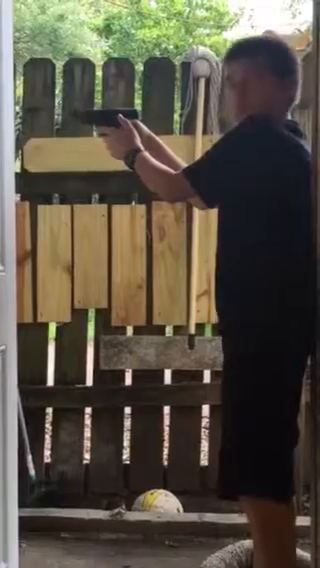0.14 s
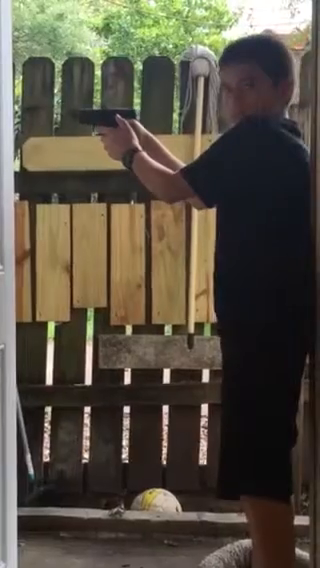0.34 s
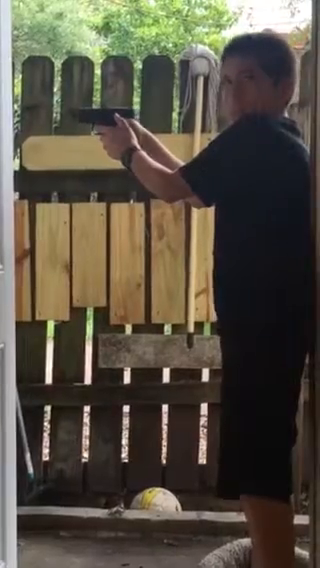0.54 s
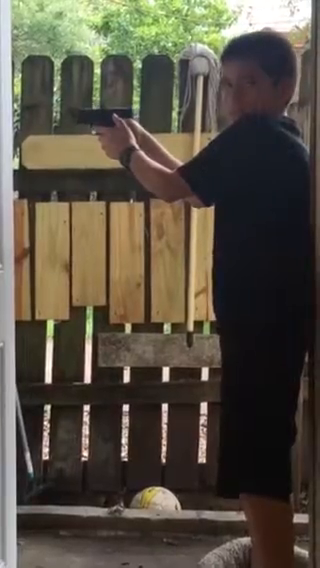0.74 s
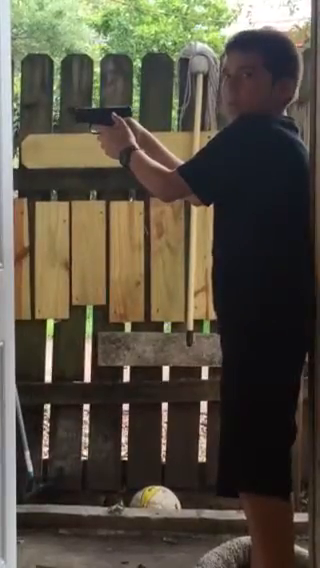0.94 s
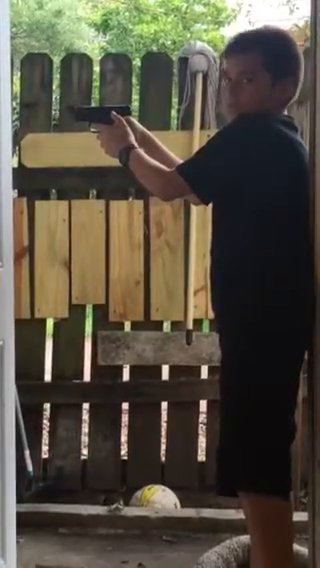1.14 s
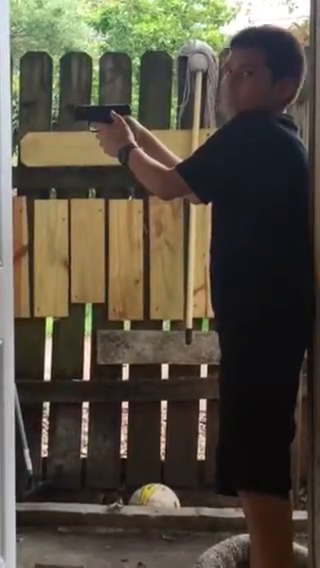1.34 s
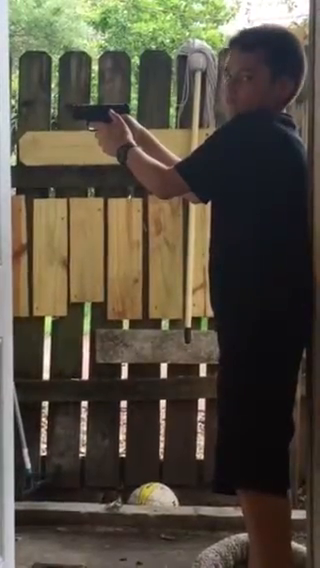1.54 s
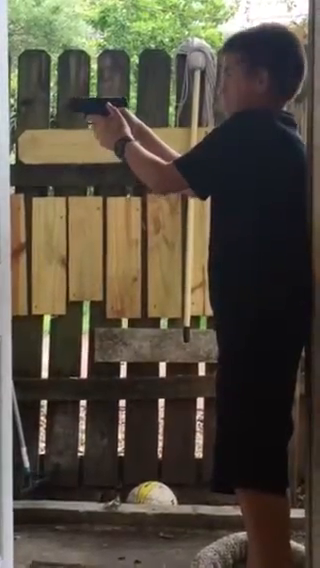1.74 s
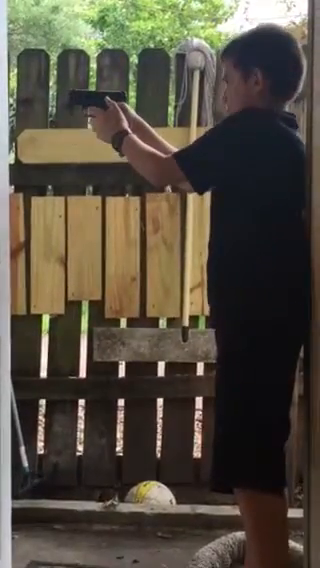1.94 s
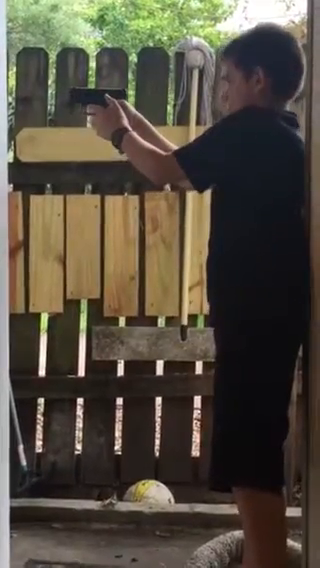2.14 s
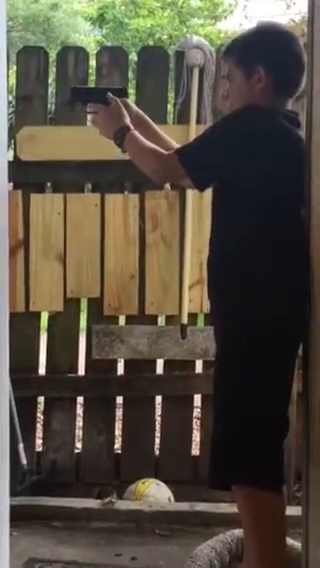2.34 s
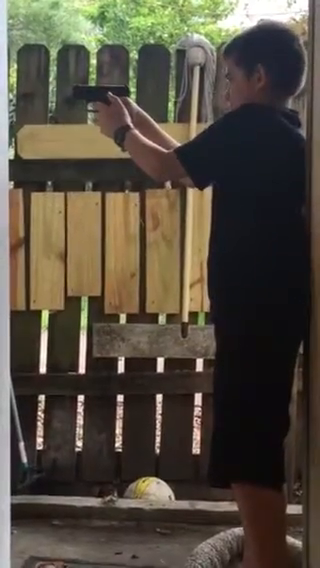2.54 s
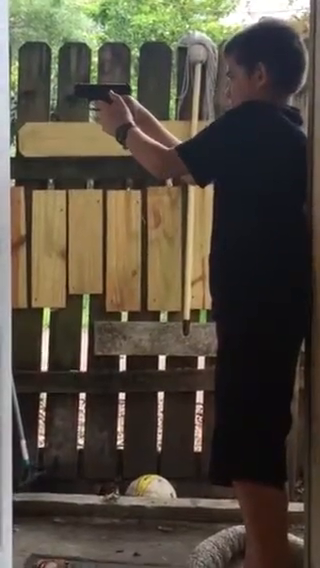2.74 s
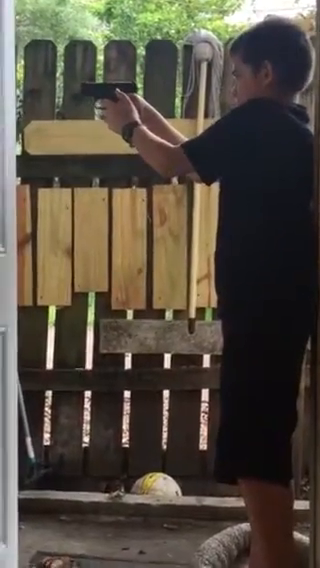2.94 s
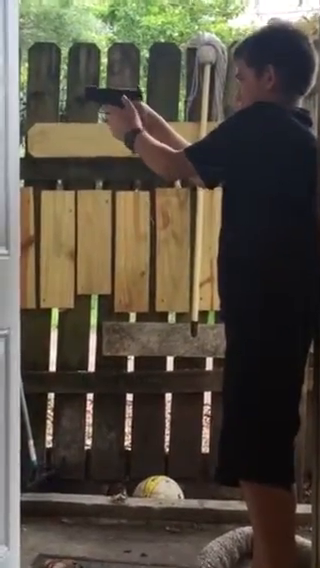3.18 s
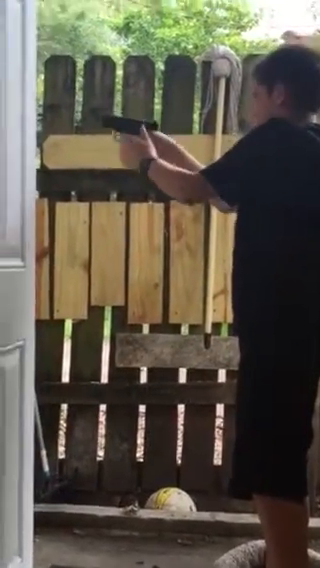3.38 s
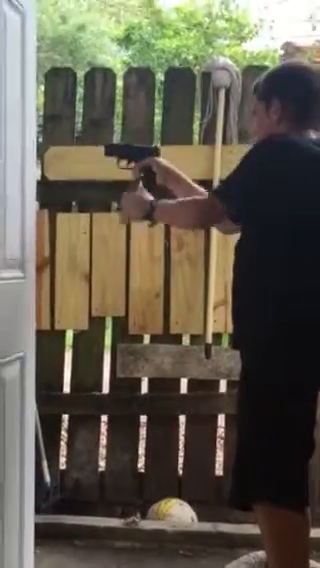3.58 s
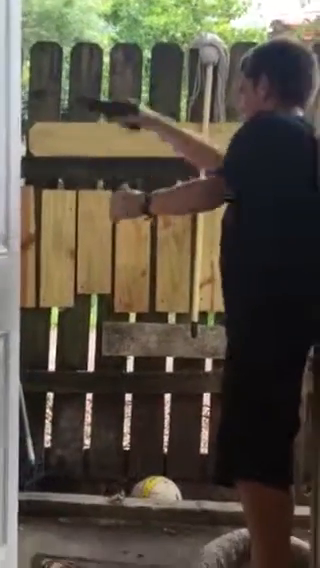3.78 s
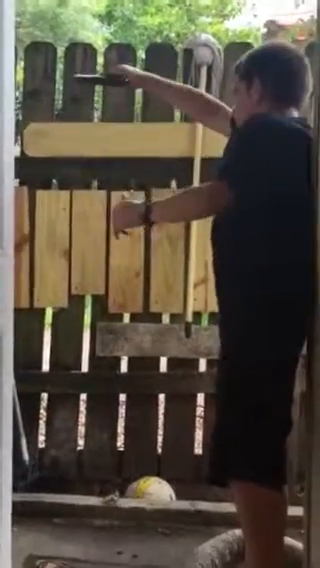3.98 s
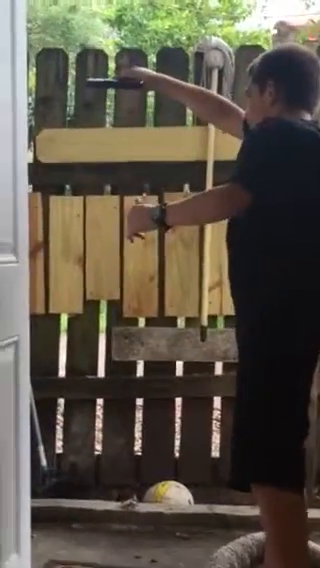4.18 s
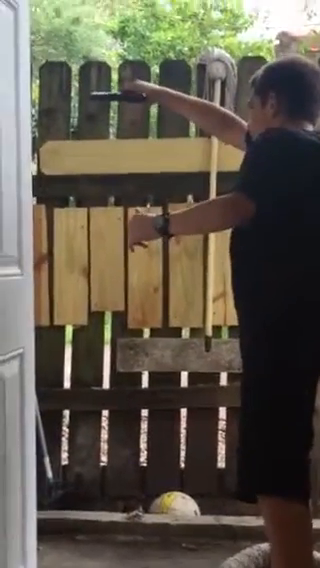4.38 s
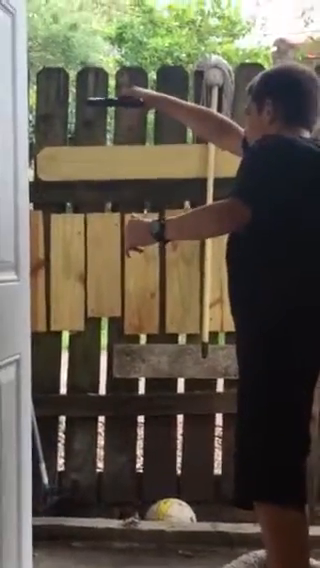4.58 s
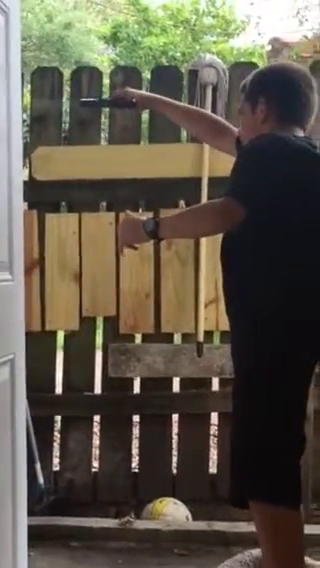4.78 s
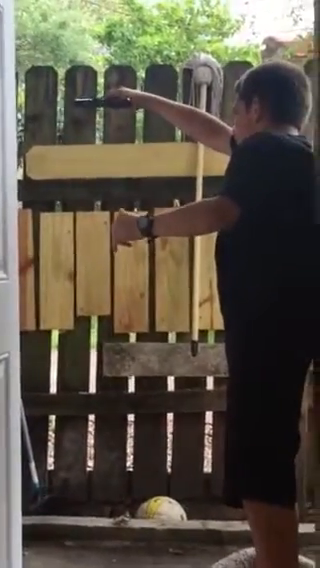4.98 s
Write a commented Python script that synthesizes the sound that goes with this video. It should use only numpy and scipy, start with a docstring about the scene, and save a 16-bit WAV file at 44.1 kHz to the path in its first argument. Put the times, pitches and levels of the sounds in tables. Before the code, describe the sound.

A low, throbbing air-conditioner hum with soft fan rush and a faint whine runs for two seconds. After small clicks, a gas pistol fires three sharp pops in quick succession, pauses with faint grip handling and clicks, then fires two more. Short bright echoes return from the porch roof and wooden fence. A phone a few steps away overloads on the pops and ducks the hum afterward.

```python
"""An air conditioner hums and rushes, then a CO2 pistol fires five shots on a roofed porch by a wooden fence.
The hum is a harmonic series on the compressor's shaft speed; the rush is noise shaped to a fan's spectrum.
Each shot is trigger clicks, a ringing valve, and a gas burst that excites the barrel and the porch's modes.
A phone a few steps away overloads on the peaks, and its gain control ducks the hum after loud sound."""
import sys
import numpy as np
from scipy import signal
from scipy.fft import rfft, irfft, next_fast_len
from scipy.io import wavfile
from scipy.ndimage import uniform_filter1d, minimum_filter1d, map_coordinates

SR = 44100
rng = np.random.default_rng(int(sys.argv[2]) if len(sys.argv) > 2 else 0)


def wav_record(signal):
    """Record a signal, one row per channel, as 16-bit PCM in the file named by sys.argv[1]."""
    frames = np.transpose(np.atleast_2d(signal))
    bounded = np.clip(frames, -1, 1)
    # unit amplitude maps onto the largest positive 16-bit level
    quanta = np.round(bounded * 32767).astype(np.int16)
    wavfile.write(sys.argv[1], SR, quanta)


N = 221293  # length in samples

# Harmonics of the compressor. Each row: multiple of its shaft speed, relative level in dB.
COMPRESSOR_HARMONICS = [(1, 2.5), (2, -6.5), (3, -5.5), (4, -7), (5, -21), (6, -22.5), (7, -20.5),
                        (8, -26.5)]
# Mains buzz and fan tones. Each row: frequency in Hz, mean level in dB rms.
MOTOR_TONES = [(120, -54), (360, -59), (577, -67), (924, -66), (1213, -72), (1444, -72)]
# Spectrum of fan rush and outdoor air. Each row: frequency in Hz, relative density in dB per Hz.
AIR_SPECTRUM = [(20, -22), (50, -20), (75, -5.5), (125, 0), (240, -13.5), (370, -16.5), (500, -21),
                (780, -23.5), (1000, -24.5), (1500, -29), (1800, -35.5), (2650, -44), (3400, -38),
                (4500, -50), (5700, -46), (8000, -54), (15300, -56.5)]
# Hand and sleeve rubbing on the grip. Each row: centre in seconds, length in seconds, level in dB.
GRIP_RUBS = [(2.08, .025, -70), (3.63, 0.055, -72), (4.2, 0.19, -69.5), (4.389, .035, -59.5)]
# Clicks of the pistol as the grip shifts. Each row: start in seconds, level in dB.
GRIP_CLICKS = [(2.032, -53), (2.076, -57), (3.598, -61), (4.372, -42), (4.391, -42.5)]
# Spectrum of clicks and rubbing. Each row: frequency in Hz, relative density in dB per Hz.
CLICK_SPECTRUM = [(300, -29), (1300, -14), (2400, 6.5), (4500, -4), (8500, -5.5), (15000, -13)]
# Decay of the late echoes. Each row: frequency in Hz, time to fall 60 dB in seconds.
ECHO_DECAY = [(150, 0.77), (450, 0.21), (1000, 0.57), (2500, 0.59), (6000, 0.63), (9000, 0.56),
              (15000, 0.34)]
# Standing waves between floor, roof and fence.
# Each row: frequency in Hz, relative level in dB, time to fall 60 dB in seconds.
PORCH_STANDING_WAVES = [(101.4, -12.5, 0.22), (127, -19, 0.14), (186.6, -8, 0.19), (231.6, -12, 0.32),
                        (262.7, -8.5, 0.27), (455, -11.5, 0.16), (677, -14.5, .2), (761, -9.5, 0.35),
                        (809.5, -9, 0.24), (887.6, -9.5, 0.33), (1092, -17.5, .35), (1207, -9.5, 0.3),
                        (1372, -17, .38), (1790, -15.5, 0.34), (2054, -14.5, .38)]
# Spectrum of the gas jet. Each row: frequency in Hz, relative density in dB per Hz.
GAS_SPECTRUM = [(60, -15), (200, -10.5), (330, -15.5), (540, -11.5), (760, -3), (1000, -7.5), (1300, -5.5),
                (1700, -6), (2500, -7.5), (4500, -10), (6200, -9.5), (8700, -10.5), (10400, -15.5),
                (11500, -12.5), (15300, -15.5)]
# Resonances of barrel and slide. Each row: frequency in Hz, width in Hz, gain in dB.
BARREL_RESONANCES = [(1237, 170, -1.5), (2274, 430, 0), (2630, 160, -8), (3700, 200, -8.5),
                     (5897, 280, -5.5), (8420, 430, -7.5)]
# The five shots. Each row: start in seconds, then relative levels in dB of the gas, the valve ping
# and the low push, then the level in dB of the trigger.
SHOT_TABLE = [(2.261, 0, -4, 0.5, -32), (2.5974, 0, 2, -1.5, -32), (2.9571, -0.5, 5, -0.5, -34),
              (4.6037, 1, -1, 0.5, -37.5), (4.9262, 1.5, 5.5, 1, -31)]
# Dips in the microphone's response. Each row: frequency in Hz, width in Hz, gain in dB.
MICROPHONE_DIPS = [(10450, 230, -7), (6590, 200, -3)]

COMPRESSOR_DB, FAN_DB = -42, -46.5  # mean levels
LOAD_DB, LOAD_PER_S = 0.75, 3  # depth and rate of the compressor's slow wandering
WHINE_DB, WHINE_FADE_DB_PER_S = 1.3, 1.5  # starting gain of the whine, and its slow weakening
TRIGGER_LEAD_S = .0225  # the trigger breaks this long before every shot
LINKAGE_S, LINKAGE_DB = .0038, -2  # its linkage clicks just after it
TOP_HZ = 15500  # band limit


def amp(db):
    """A level in decibels is twenty times the log of an amplitude ratio; this inverts it."""
    return 10 ** (np.asarray(db) / 20)


def unit(x):
    """Normalisation: equal mean power is an rms of 1."""
    return x / np.sqrt(np.mean(x ** 2) + 1e-20)


def along(points, hz):
    """Interpolation on a log-frequency axis through (Hz, value) points."""
    f, v = np.transpose(points)
    return np.interp(np.log(hz + 1), np.log(f), v)


def wobble(rate):
    """Slow random modulation: a smooth curve through random knots, rate of them a second."""
    knots = rng.standard_normal(int(N * rate / SR) + 4)
    return map_coordinates(knots, [np.arange(N) * rate / SR])


def filtered(x, response):
    """Linear filtering: the spectrum is multiplied by a response of frequency."""
    m = next_fast_len(len(x) + SR // 2)
    return irfft(rfft(x, m) * response(np.fft.rfftfreq(m, 1 / SR)), m)[:len(x)]


def coloured(x, spectrum, size=4096):
    """Minimum-phase filtering: a causal response of energy 1 is built from the spectrum's cepstrum."""
    magnitude = amp(along(spectrum, np.fft.rfftfreq(size, 1 / SR)))
    cepstrum = irfft(np.log(magnitude + 1e-6))
    response = irfft(np.exp(rfft(2 * cepstrum[:size // 2], size)))
    return signal.fftconvolve(x, response / np.linalg.norm(response))[:len(x)]


def resonant(x, modes):
    """Resonance: damped second-order oscillators in parallel, as (Hz, width, dB)."""
    def response(f):
        return sum(amp(db) * 1j * f * w / (c * c - f * f + 1j * f * w) for c, w, db in modes)
    return filtered(x, response)


def add(track, s, sound):
    """Superposition: a sound is summed into the track from time s."""
    part = track[round(s * SR):][:len(sound)]
    part += sound[:len(part)]


def burst(t60):
    """Exponential decay: a second of noise starts at once and falls 60 dB in t60 seconds."""
    return rng.standard_normal(SR) * amp(-60 * np.arange(SR) / SR / t60)


def compressor(shaft_hz=58.2, waver_db=2):
    """Periodic forcing: cosine harmonics in phase add up to one thud a turn of the shaft."""
    t = np.arange(N) / SR
    shaft = 2 * np.pi * shaft_hz * t + 0.065 * wobble(15)
    harmonics = [amp(db + waver_db * wobble(8.3)) * np.cos(k * shaft) for k, db in COMPRESSOR_HARMONICS]
    strokes = -unit(sum(harmonics))
    return amp(COMPRESSOR_DB + LOAD_DB * wobble(LOAD_PER_S)) * strokes


def motor(waver_db=2, drift=.7):
    """Tonal radiation: sine lines with randomly wandering level and phase (drift in radians)."""
    t = np.arange(N) / SR
    tones = np.zeros(N)
    for hz, db in MOTOR_TONES:
        level = np.sqrt(2) * amp(db + waver_db * wobble(7.7))  # rms to peak
        tones += level * np.sin(2 * np.pi * hz * t + drift * wobble(5.2))
    return tones


def whine(whine_hz=2228):
    """Narrow-band sound: an unsteady sine and resonant noise beside it weaken together."""
    t = np.arange(N) / SR
    tone = amp(-62.5 + 2.6 * wobble(22)) * np.sin(2 * np.pi * whine_hz * t + 0.53 * wobble(12))
    narrow = resonant(rng.standard_normal(N), [(2214, 170, 0)])
    narrow = resonant(narrow, [(2080, 470, 0)])
    whistle = amp(-67.0 + 1.6 * wobble(4.2)) * unit(narrow)
    return amp(WHINE_DB - WHINE_FADE_DB_PER_S * t) * (tone + whistle)


def fan():
    """Broadband flow noise: random pressure shaped to the air's spectrum, gently varying in level."""
    rush = coloured(rng.standard_normal(N), AIR_SPECTRUM)
    return amp(FAN_DB + 0.82 * wobble(7.6)) * rush


def air_conditioner():
    """Superposition of harmonic, tonal and broadband sources in one machine."""
    return compressor() + motor() + whine() + fan()


def handling():
    """Friction noise: rubbing as the grip shifts, in soft swells with a rough random envelope."""
    t = np.arange(N) / SR
    swell = sum(amp(db) * np.exp(-((t - s) / length) ** 2) for s, length, db in GRIP_RUBS)
    return swell * amp(3.4 * wobble(60)) * coloured(rng.standard_normal(N), CLICK_SPECTRUM)


def echoes(early_db=2, late_db=1, early_t60=.18, gap=0.0022, reach=.56):
    """Reverberation: dense echoes off roof and fence, and a tail whose decay depends on frequency."""
    t = np.arange(SR) / SR
    hz, frames, z = signal.stft(rng.standard_normal(SR), SR, nperseg=256)
    decay = amp(-60 * frames / along(ECHO_DECAY, hz)[:, None])
    late = signal.istft(z * decay, SR, nperseg=256)[1][:SR]
    late *= np.exp(-(t / reach) ** 6)  # the open yard has no far walls to prolong the tail
    early = burst(early_t60) * np.abs(rng.standard_normal(SR)) ** .5  # a few echoes stand out
    onset = 1 - np.exp(-t / gap)
    return (amp(early_db) * unit(early) + amp(late_db) * unit(late)) * onset / np.sqrt(SR)


def porch(walls, alike=0.87):
    """Partial correlation: the same walls answer every time, but never quite alike."""
    return np.sqrt(alike) * walls + np.sqrt(1 - alike) * echoes()


def standing_waves():
    """Modal decay: each porch mode rings as a damped sine, neighbours with opposite signs."""
    t = np.arange(SR) / SR
    rings = np.zeros(SR)
    for k, (hz, db, t60) in enumerate(PORCH_STANDING_WAVES):
        rings += (-1) ** k * amp(db - 60 * t / t60) * np.sin(2 * np.pi * hz * t)
    return rings * (1 - np.exp(-t / 0.0015))


def push(hz=135, length=0.013, delay=.0135):
    """Volume displacement: the expanding gas cloud swings the air between floor and roof."""
    t = np.arange(SR) / SR
    swing = -np.sin(2 * np.pi * hz * (t - delay)) * np.exp(-((t - delay) / length) ** 2)
    return swing * (1 - np.exp(-t / 0.0044))


def trigger(walls, creak_hz=3080, creak_db=-62):
    """Impact and stick-slip: two clicks before each shot, grip clicks, and a spring creak before the first."""
    out = np.zeros(N)
    breaks = [(s - TRIGGER_LEAD_S, db) for s, *_, db in SHOT_TABLE]
    linkage = [(s + LINKAGE_S, db + LINKAGE_DB) for s, db in breaks]
    for s, db in breaks + linkage + GRIP_CLICKS:
        click = burst(t60=.01) + amp(13) * porch(walls)
        add(out, s, amp(db) * coloured(click, CLICK_SPECTRUM))
    creak = unit(resonant(rng.standard_normal(N), [(creak_hz, 60, 0)]))
    pull = np.exp(-((np.arange(N) / SR - 2.21) / .03) ** 4)
    return out + amp(creak_db) * creak * pull


def valve_ping(hz=8400, t60=0.0076, slide_s=0.0086, slide_db=-5):
    """Free vibration: steel rings when the hammer strikes the valve and again as the slide hits its stop."""
    t = np.arange(SR) / SR
    ring = np.sin(2 * np.pi * hz * t) * amp(-60 * t / t60)
    both = ring.copy()
    add(both, slide_s, amp(slide_db) * ring)
    return both


def pistol(walls):
    """Jet noise and resonance: gas hisses, rings the barrel, and its push sets off standing waves."""
    out, t = np.zeros(N), np.arange(SR) / SR
    low = amp(-8.0) * standing_waves() + amp(-13.5) * push()
    opening = 1 - np.exp(-t / 0.0005)  # the valve takes a moment to open
    for s, gas_db, ping_db, push_db, _ in SHOT_TABLE:
        answer = porch(walls)
        jet = coloured(burst(t60=0.03) + amp(24) * answer, GAS_SPECTRUM)
        barrel = resonant(amp(15) * burst(t60=0.043) + amp(26.5) * answer, BARREL_RESONANCES)
        gas = amp(gas_db) * (jet + barrel)
        ping = amp(ping_db + 4.0) * valve_ping()
        add(out, s, opening * (gas + ping) + amp(push_db) * low)
    return out


def scene():
    """Superposition of everything heard on the porch, as one channel."""
    walls = echoes()
    return (air_conditioner() + handling() + trigger(walls) + pistol(walls))[None]


def gain_control(x, threshold_db=-20, most_db=8, release_db=27, attack=0.02):
    """Feed-forward compression: loud sound lowers the gain, which holds, then rises release_db a second."""
    t, hold = np.arange(N) / SR, 7001  # hold in samples
    level_db = 10 * np.log10(np.abs(uniform_filter1d(x ** 2, size=64)) + 1e-12)
    gain_db = np.clip(threshold_db - level_db, -most_db, 0)
    gain_db = minimum_filter1d(gain_db, hold, origin=hold // 2)  # looks back only
    gain_db = np.minimum.accumulate(gain_db - release_db * t) + release_db * t  # limits the rise
    pole = np.exp(-1 / (attack * SR))  # attack in seconds
    return x * amp(signal.lfilter([1 - pole], [1, -pole], gain_db))


def record(dry, ceiling=0.58, hardness=6):
    """Transduction: the phone dips the treble, rides its gain, saturates softly and limits the band."""
    def microphone(f):
        return amp(sum(db * np.exp(-((f - hz) / width) ** 2) for hz, width, db in MICROPHONE_DIPS))
    x = gain_control(filtered(dry[0], microphone))
    x = x / (1 + np.abs(x / ceiling) ** hardness) ** (1 / hardness)
    return filtered(x, lambda hz: 1 / (1 + (hz / TOP_HZ) ** 120))[None]


dry = scene()
out = record(dry)
wav_record(out)
```